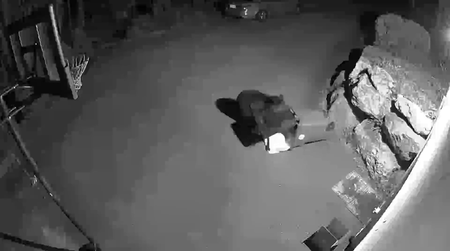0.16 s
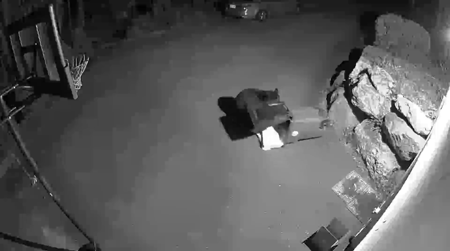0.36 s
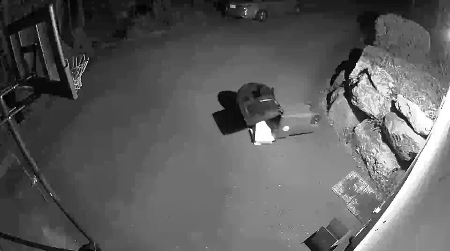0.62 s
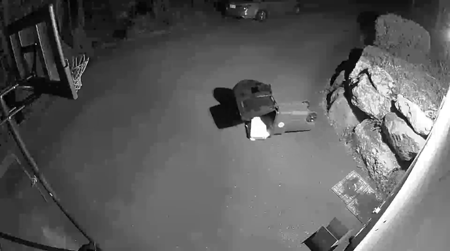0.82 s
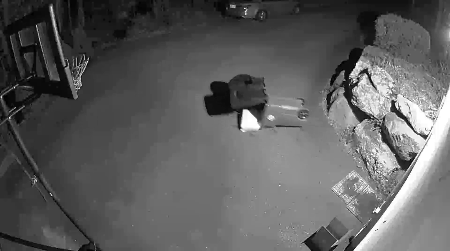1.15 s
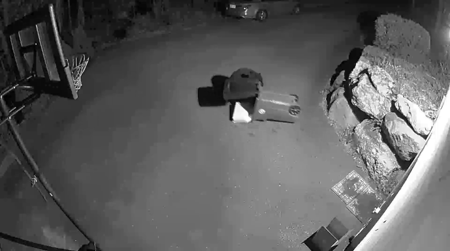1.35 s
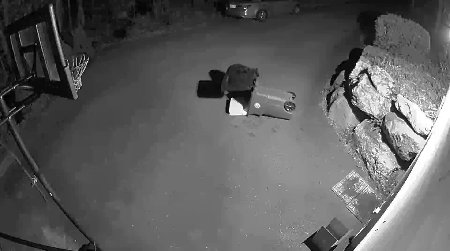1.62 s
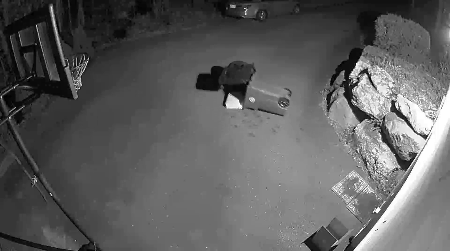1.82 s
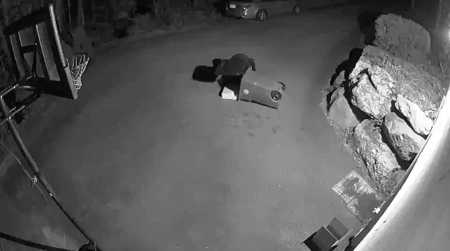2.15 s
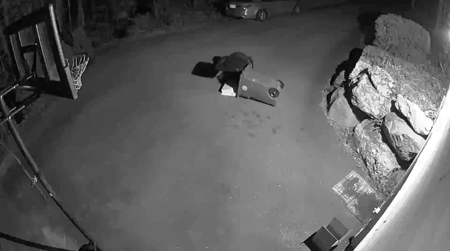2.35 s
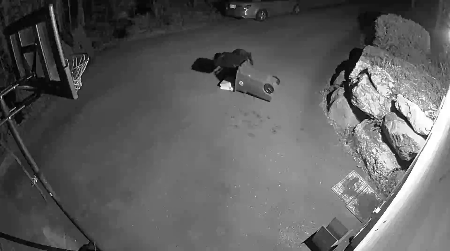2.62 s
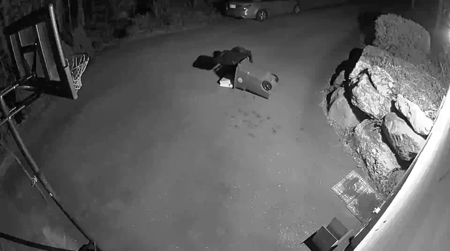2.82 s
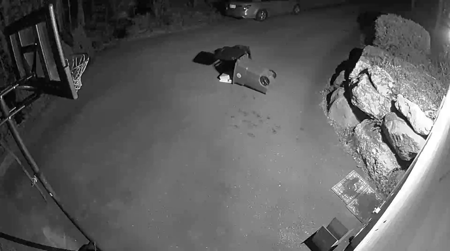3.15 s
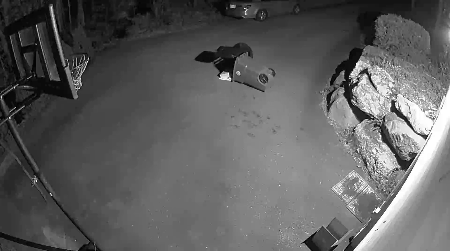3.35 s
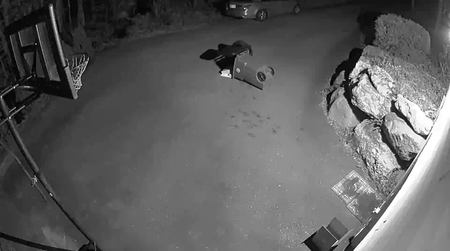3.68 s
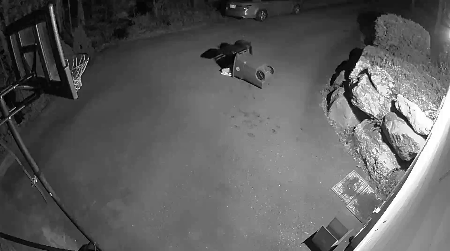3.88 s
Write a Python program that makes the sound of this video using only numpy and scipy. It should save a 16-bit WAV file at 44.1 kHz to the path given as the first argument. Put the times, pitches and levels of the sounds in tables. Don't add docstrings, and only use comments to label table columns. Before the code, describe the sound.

A plastic trash bin is dragged on its side over gritty pavement, juddering hollowly in uneven tugs, with crunches and soft knocks, then fading; outdoors at night, a small dull-topped microphone some metres away.

```python
import sys
import numpy as np
from scipy import signal
from scipy.fft import rfft, irfft
from scipy.io import wavfile
from scipy.ndimage import uniform_filter1d

SR = 44100
rng = np.random.default_rng(int(sys.argv[2]) if len(sys.argv) > 2 else 0)


def rack_gain(trim_db):
    fader = np.asarray(trim_db, float)
    return 10 ** (fader / 20)


def dump(signal):
    limited = np.clip(np.atleast_2d(signal).T, -1, 1)
    pcm = np.round(limited * 32767).astype(np.int16)
    wavfile.write(sys.argv[1], SR, pcm)


N = 176400

# (time [s], judder level [dB], extra ring of the thin upper wall [dB])
TUGS = [(0, -54.5, 0.5), (.26, -50, 6), (.57, -51, 1), (.66, -57.5, 1.5), (.93, -59, 1.5), (1.02, -45, 5),
        (1.27, -50, 1.5), (1.35, -60, -1), (1.77, -47, 1.5), (1.82, -46, 5), (1.94, -53, 5),
        (2.0, -61.5, -20), (2.26, -56.5, -1), (2.33, -51, 5), (2.74, -53.5, -14), (2.82, -50.5, 0),
        (3.58, -62, -6), (4, -81, 5)]
# (time [s], level [dB])
BELLY_BOOM = [(0, -8.5), (.3, 3.5), (.75, -4), (.88, 3), (1.2, 2), (1.6, -4.5), (2.0, 5), (2.3, 5.5),
              (2.65, -4), (2.85, -4), (3.2, -3), (3.38, -3), (3.7, 5), (4, 5)]
# (frequency [Hz], width [Hz], level [dB])
BIN_MODES = [
    (89, 29, -6),
    (126, 60, -1),
    (179, 65, -7.5),
    (343.6, 41, -0.5),
    (491, 50, -4.5),
    (640.4, 56, -1.5),
    (691, 35, -1.5),
    (856, 58, -8.5),
    (1157.5, 20, -5.5),
]
# (frequency [Hz], level [dB])
WALL_COLOUR = [(40, -12), (80, -3), (300, -3.5), (700, -3), (1100, -15.5), (1500, -30), (2000, -15),
               (4000, -46)]
HOPS = [2.699, 2.737, 3.157, 3.196, 3.294, 3.377]
# (time [s], fine grit level [dB], coarse stones among it [dB])
SCRAPES = [(0.0, -54.5, -13), (0.11, -52.5, -1.5), (0.29, -54, 0.5), (0.72, -57.5, 0.5), (0.93, -50, -6.5),
           (1.08, -49, 1.5), (1.37, -56, -8.5), (1.73, -49.5, -1), (2.0, -61, -1), (2.28, -59, 4.5),
           (2.47, -53.5, -7.5), (2.81, -60.5, 9), (3.0, -57.5, -4.5), (3.41, -56, -1), (3.85, -73, 3),
           (4.0, -74.5, -0.5)]
# (frequency [Hz], level [dB])
GRIT_COLOUR = [(60, -32), (300, -3.5), (700, -7.5), (1500, -9.5), (3000, -7), (4500, -11), (7000, -20),
               (9000, -10.5)]
EARLY_CRUNCH_TIMES = [.1047, .142, .298, .425, .438, .4828, .537, .612, .694, .8, 1.004, 1.013, 1.043,
                      1.1009, 1.295, 1.3463, 1.395, 1.452, 1.575, 1.596, 1.603, 1.66, 1.678, 1.685, 1.709,
                      1.722, 1.769, 1.796, 1.894]
# (peak [dB], ringing pitch [Hz], brightness [dB per octave], length [s], rise [s])
EARLY_CRUNCHES = [(-42, 1700, -16, .01, 0.0023), (-38.5, 3430, -17, 0.013, 0.0085),
                  (-37.5, 1660, -17, 0.014, 0.0037), (-30.5, 8000, 5, 0.0047, 0.00068),
                  (-32.5, 11000, -11, 0.013, 0.0017), (-41, 3600, -5, 0.0054, .002),
                  (-47, 8300, 15, 0.0054, 0.0012), (-43, 6100, -2, 0.0069, 0.0024),
                  (-42.5, 3400, -3, 0.0062, 0.0011), (-39.5, 4000, 9, .004, .001),
                  (-23.5, 3580, -10, 0.0099, 0.00075), (-26, 1904, -8.5, 0.015, 0.0013),
                  (-37.5, 3200, 1, 0.035, .004), (-40, 6200, -6, 0.0081, 0.0017),
                  (-53.5, 1900, -17, .025, .003), (-46, 3400, -9, 0.025, 0.0033),
                  (-38.5, 2700, -5, .01, 0.0029), (-34.5, 2760, 0, 0.0076, 0.0008),
                  (-39.5, 3600, -15, 0.017, 0.0068), (-30, 2900, 0, .008, 0.0011),
                  (-28.5, 2040, -2, 0.0085, 0.0014), (-36, 1800, -11.5, .014, 0.0018),
                  (-27, 9900, -8, 0.011, .003), (-43, 3900, -8, 0.0051, 0.0016),
                  (-41.5, 5900, 6, 0.012, 0.0013), (-41.5, 2300, 2, 0.011, 0.0016),
                  (-38, 2400, -18, 0.0058, 0.0021), (-39.5, 5200, 5, 0.006, 0.0029),
                  (-45, 2020, -6, 0.0076, .002)]
LATE_CRUNCH_TIMES = [2.2797, 2.284, 2.305, 2.318, 2.382, 2.413, 2.5067, 2.582, 2.606, 2.645, 2.752, 2.771,
                     2.7806, 2.855, 3.017, 3.06, 3.078, 3.111, 3.13, 3.2155, 3.229, 3.2505, 3.3947, 3.403,
                     3.419, 3.4365, 3.76, 3.768, 3.8965]
# (peak [dB], ringing pitch [Hz], brightness [dB per octave], length [s], rise [s])
LATE_CRUNCHES = [(-26.5, 5800, -2, 0.0022, 0.00024), (-31, 2800, -13, 0.014, 0.00067),
                 (-36, 5900, 14, 0.023, .001), (-38, 2500, -10, 0.015, 0.0012),
                 (-37, 3850, -10, 0.02, 0.0013), (-38, 8500, 23, 0.0065, .002),
                 (-37.5, 2960, -7, 0.037, 0.0012), (-30.5, 2830, -20.5, 0.017, 0.00075),
                 (-38, 3050, -4, 0.019, 0.0027), (-39.5, 5250, -5, 0.0043, 0.00056),
                 (-36.5, 7000, 13, 0.0026, .0004), (-35.5, 2140, -7, .012, 0.0074),
                 (-25, 2970, 5, 0.0085, 0.00068), (-42.5, 2260, -4, 0.014, 0.0016),
                 (-43, 2000, 0, .015, 0.0014), (-39.5, 2500, 4, .02, 0.0039), (-40, 2270, 9, 0.024, 0.0016),
                 (-33, 2950, 1, 0.015, 0.00062), (-41.5, 4300, -14, 0.027, 0.0018),
                 (-37, 4800, -25, 0.011, .001), (-40.5, 3200, -6, 0.026, 0.0021),
                 (-28.5, 2860, -15.5, 0.011, 0.0014), (-36, 6500, 14, 0.0037, .001),
                 (-40, 2500, 11, 0.0073, 0.0024), (-50, 2000, 0, 0.005, 0.001),
                 (-33.5, 2270, 2, 0.0044, 0.0022), (-44, 2700, 6, 0.016, .001),
                 (-46.5, 4400, -2, 0.0075, 0.0013), (-53, 2200, -11, 0.0058, 0.00087)]
# (time [s], peak [dB], pitch [Hz], ring time to -60 dB [s])
KNOCKS = [(.09, -41, 714, .04), (.202, -40, 820, 0.061), (.222, -34.5, 744, 0.038), (.247, -42, 794, 0.033),
          (.259, -36.5, 615, 0.084), (.293, -30.5, 576, 0.055), (.295, -37, 1090, 0.042),
          (.318, -38, 900, 0.036), (.403, -36, 540, 0.033), (.428, -41, 632, 0.061),
          (.483, -43.5, 650, 0.078), (.538, -40.5, 874, 0.057), (.968, -41.5, 674, .05),
          (1.002, -34, 600, 0.035), (1.055, -38.5, 705, 0.073), (1.094, -40, 1180, 0.065),
          (1.155, -42, 423, 0.03), (1.181, -43, 480, 0.059), (1.243, -36, 687, 0.03),
          (1.457, -48.5, 679, 0.15), (1.575, -47, 610, 0.057), (1.72, -41.5, 695, 0.068),
          (1.759, -41, 515, 0.046), (1.803, -39, 600, 0.097), (1.863, -34.5, 1134, 0.032),
          (1.892, -44, 666, 0.065), (2.281, -38, 605, 0.043), (2.318, -35, 440, .05),
          (2.33, -43, 930, 0.072), (2.343, -36, 715, 0.054), (2.508, -47, 394, 0.053),
          (2.54, -42.5, 342, 0.055), (2.584, -39.5, 673, .04), (2.78, -37.5, 662, 0.071),
          (3.002, -46, 667, 0.069), (3.229, -46.5, 336, .054), (3.252, -42, 740, 0.036),
          (3.403, -49.5, 196, 0.13), (3.435, -46, 690, 0.038)]
# (time [s], peak [dB], pitch [Hz], length [s])
CLUCKS = [
    (3.173, -47, 903, 0.02),
    (3.315, -54, 832, 0.023),
]
# (frequency [Hz], level [dB])
MIC_COLOUR = [(40, 6.5), (100, 4), (1500, -1), (2050, 4.5), (2500, -2), (3150, 3), (4200, 0), (7500, -0.5)]


def colour(x, points):
    hz, db = np.array(points, float).T
    f = np.maximum(np.arange(2049) * SR / 4096, 1)
    log_gain = np.interp(np.log(f), np.log(hz), db) * np.log(10) / 20
    cepstrum = irfft(log_gain)
    cepstrum[1:2048] *= 2
    cepstrum[2049:] = 0
    response = irfft(np.exp(rfft(cepstrum)))
    return signal.fftconvolve(x, response)[:len(x)]


def unit(x):
    return x / np.sqrt(np.mean(x ** 2))


def clicks(per_s, scatter_db, size=N):
    chance, side, strength = rng.random((3, size))
    scatter = np.minimum(-np.log(1 - strength), 4)
    return (chance < per_s / SR) * np.sign(side - .5) * rack_gain(scatter_db * scatter)


def walk(rate):
    hold = int(SR / rate)
    steps = rng.standard_normal(2000)
    return uniform_filter1d(np.repeat(steps[:N // hold + 1], hold), hold)[:N]


def ring(x, hz, width_hz):
    return signal.lfilter(*signal.iirpeak(hz, hz / max(width_hz, 5), SR), x)


def control(rows, axis=1):
    rows = np.array(rows)
    return rack_gain(np.interp(np.arange(N) / SR, rows[:, 0], rows[:, axis]))


def slips():
    return clicks(per_s=2200, scatter_db=1.66) * rack_gain(2.5 * walk(28))


def judder():
    upper = control(TUGS, axis=2)
    modes = 0
    for hz, width, db in BIN_MODES:
        sway = upper ** 2 if hz > 1000 else rack_gain(2.0 * walk(5.58))
        mode = unit(ring(ring(slips(), hz, 1.13 * width), hz, 3 * width))
        modes = modes + rack_gain(db - 6.0) * sway * mode
    thin_wall = rack_gain(-8.0) * upper * unit(ring(ring(slips(), 1054, 500), 1000, 800))
    body = unit(colour(slips(), WALL_COLOUR)) + rack_gain(-1) * modes + thin_wall
    belly = signal.sosfiltfilt(signal.butter(2, 150, fs=SR, output="sos"), body)
    return control(TUGS) * (body + (control(BELLY_BOOM) - 1) * belly) * rack_gain(-5.5)


def grains():
    patches = 3 * walk(14) + 0.81 * walk(65)
    return clicks(per_s=5400, scatter_db=3.5) * rack_gain(patches)


def grit():
    stone_colour = [(1200, -10.5), (2600, 1.0), (4450, -4.5), (4800, -5.0)]  # (Hz, dB)
    stones = control(SCRAPES, axis=2) * unit(colour(grains(), stone_colour))
    fine = unit(colour(grains(), GRIT_COLOUR))
    return control(SCRAPES) * (fine + stones)


def ground_contact():
    now = np.arange(N) / SR
    hop_db, hop_s = -6.5, 0.018
    return rack_gain(hop_db * sum(np.exp(-((now - s) / hop_s) ** 2) for s in HOPS))


def crunches():
    t = np.arange(8820) / SR
    out = np.zeros(N + len(t))
    times = EARLY_CRUNCH_TIMES + LATE_CRUNCH_TIMES
    for s, (db, hz, tilt_db, length, rise) in zip(times, EARLY_CRUNCHES + LATE_CRUNCHES):
        swarm = unit(clicks(per_s=9000, scatter_db=1.5, size=len(t)))
        attack = np.minimum(t / max(rise, .0003), 1)
        decay = np.exp(-(np.maximum(t - rise, 0) / max(length, .002)) ** 1.6)
        first_shard = 1 + rack_gain(-3) * np.exp(-t / .0018)
        swarm = swarm * attack * decay * first_shard
        tilt = [(700, 4.5), (1400, 2.5), (1900, -.4 * tilt_db + 0.5), (3200, 1), (8000, 0.44 * tilt_db)]
        broad = unit(colour(swarm, tilt))
        both = broad + rack_gain(-1) * unit(ring(swarm, hz, .13 * hz))
        out[int(s * SR):][:len(t)] += rack_gain(db - 0.5) * both / np.abs(both).max()
    return out[:N]


def knocks():
    t = np.arange(8820) / SR
    out = np.zeros(N + len(t))
    for s, db, hz, t60 in KNOCKS:
        push = np.minimum(t / .004, 1) * rack_gain(-60 * t / max(t60, .01))
        noise = rng.standard_normal(len(t))
        thud = unit(ring(ring(noise, hz, .8 * hz), hz, .8 * hz))
        note = np.sin(2 * np.pi * hz * t)
        out[int(s * SR):][:len(t)] += rack_gain(db - 3) * push * (note + thud)
    return out[:N]


def clucks():
    out, t = 0, np.arange(N) / SR
    for s, db, hz, length in CLUCKS:
        u = np.clip((t - s) / length, 0, 1)
        cycles = hz * length * u * (1 + 0.068 * (u - 1))
        out = out + rack_gain(db) * np.sin(np.pi * u) ** 2 * np.sin(2 * np.pi * cycles)
    return out


def yard(near):
    level_db, t60_s, first_echo_s = -12.5, 0.2, .004
    t = np.arange(SR // 2) / SR
    tail = rng.standard_normal(len(t)) * rack_gain(-60 * t / t60_s) * (t > first_echo_s)
    tail = tail / np.sqrt(np.sum(tail ** 2))
    return rack_gain(level_db) * signal.fftconvolve(near, tail)[:N]


def scene():
    drag = ground_contact() * (judder() + grit())
    near = drag + crunches() + knocks() + clucks()
    return (near + yard(near))[None]


def low_pass(x):
    return signal.sosfilt(signal.butter(12, 9020, fs=SR, output="sos"), x)


def record(dry):
    notch_hz, notch_width_hz = 2416, 122
    top_hz, cut_hz = 7510, 8406
    humped = dry[0] + rack_gain(-6.5) * ring(dry[0], 2087, 220)
    x = colour(humped, MIC_COLOUR)
    x = signal.lfilter(*signal.iirnotch(notch_hz, notch_hz / notch_width_hz, SR), x)
    x = colour(x, [(top_hz, 0), (cut_hz, -14)])
    x = signal.sosfilt(signal.cheby1(10, .5, cut_hz, fs=SR, output="sos"), x)
    x = signal.sosfilt(signal.butter(6, 42, "high", fs=SR, output="sos"), x)
    return low_pass(x[None])


dry = scene()
out = record(dry)
dump(out)
```